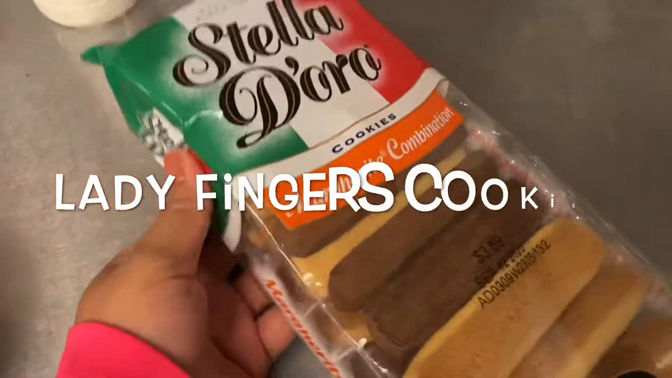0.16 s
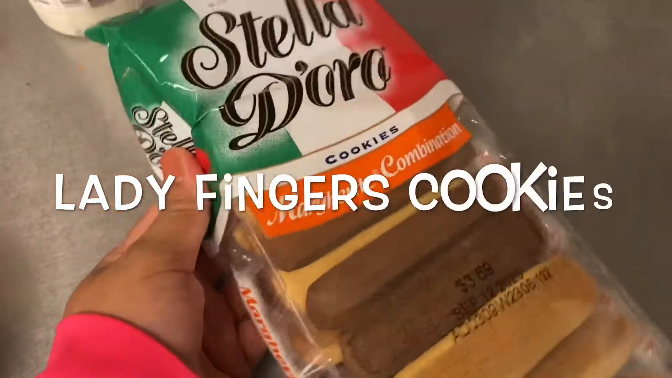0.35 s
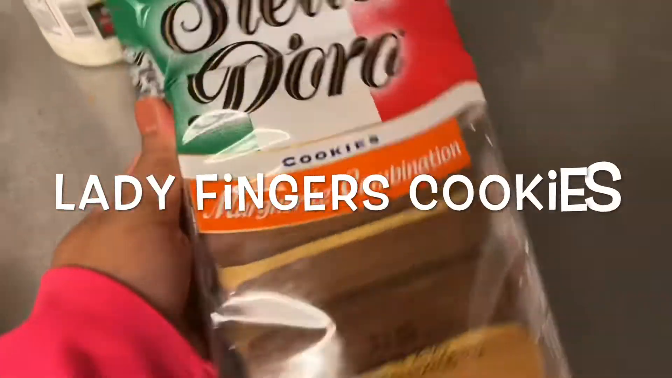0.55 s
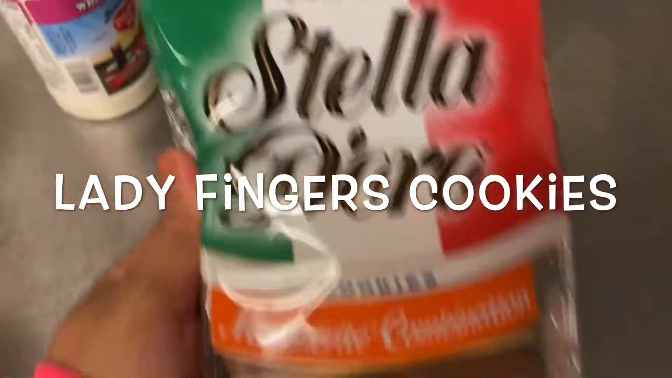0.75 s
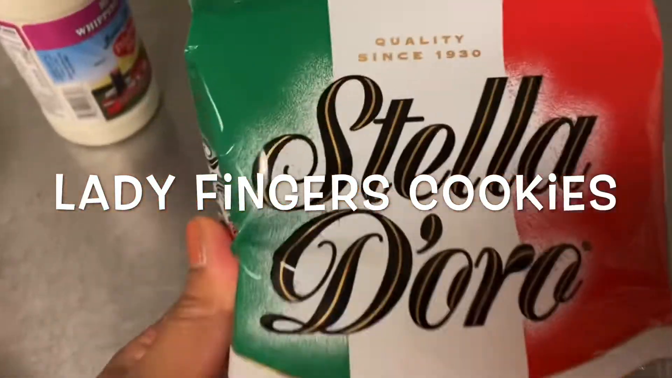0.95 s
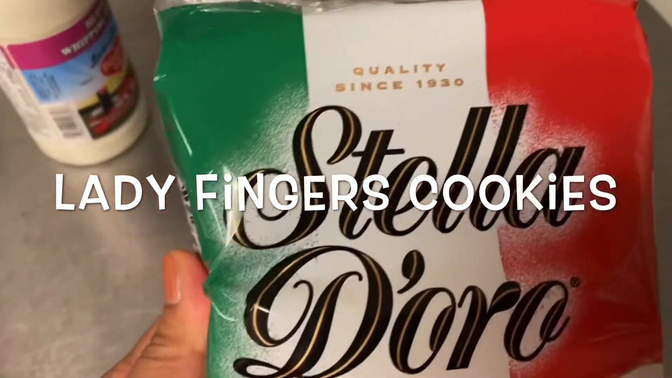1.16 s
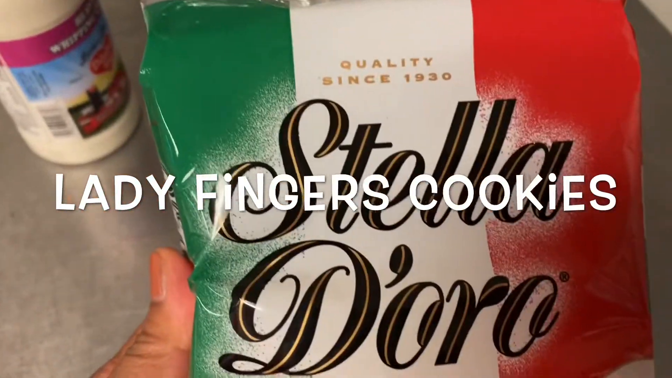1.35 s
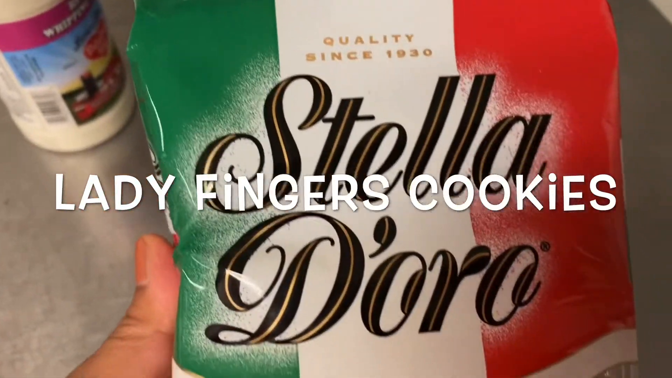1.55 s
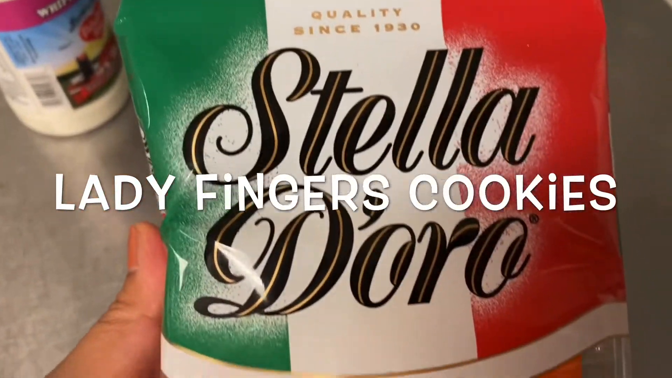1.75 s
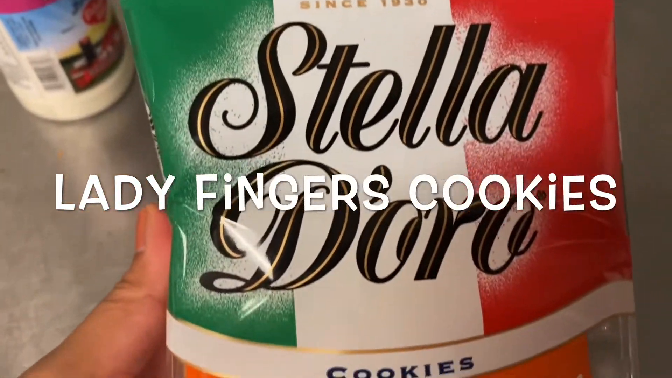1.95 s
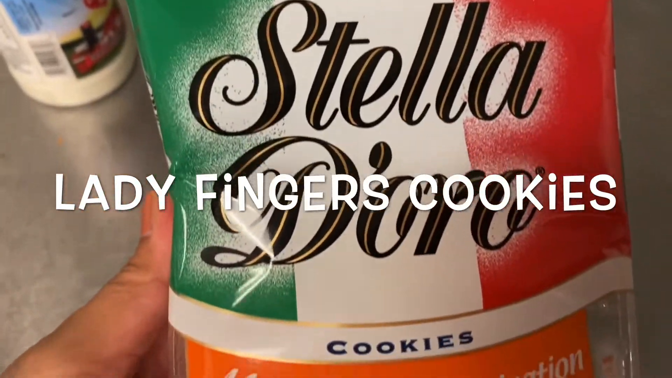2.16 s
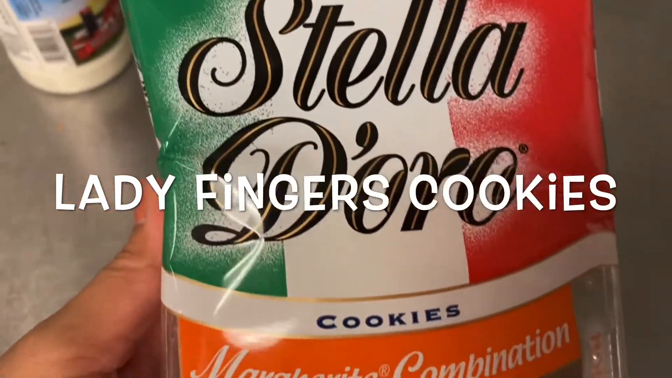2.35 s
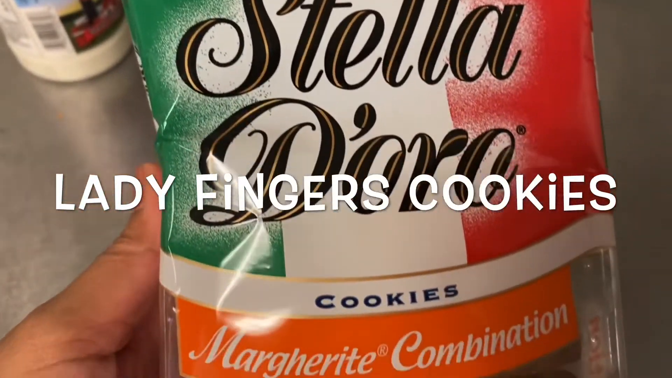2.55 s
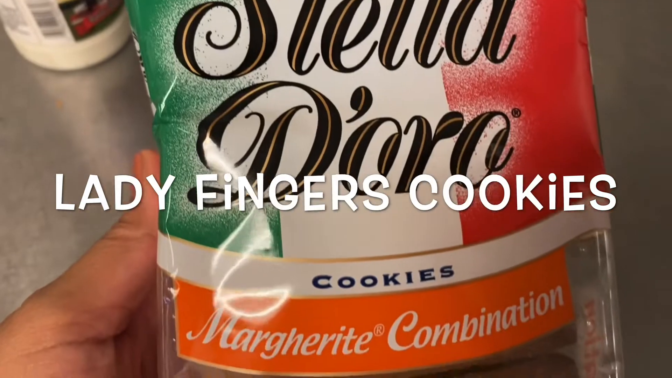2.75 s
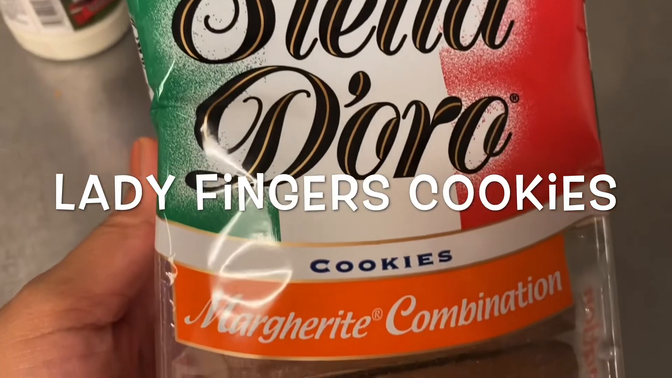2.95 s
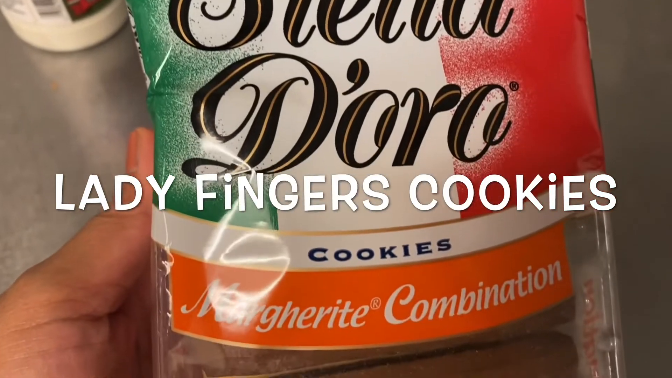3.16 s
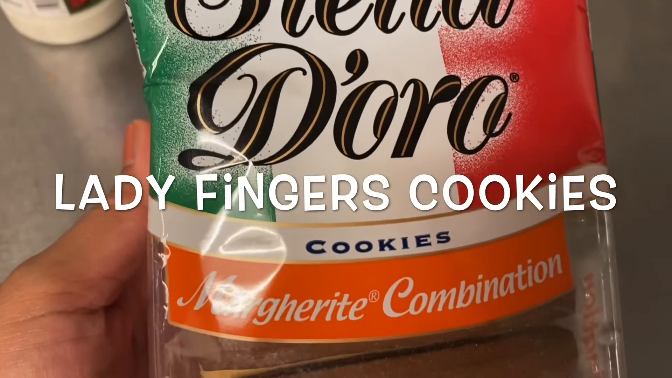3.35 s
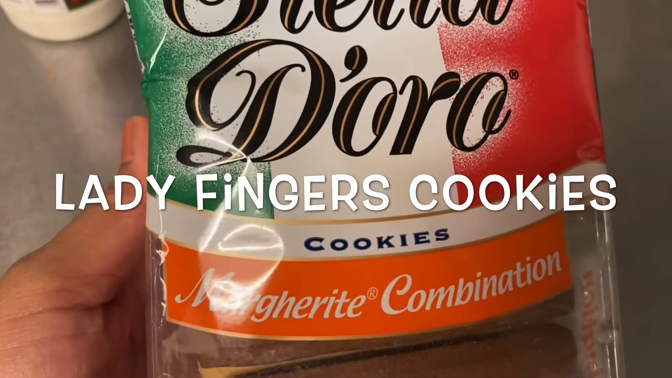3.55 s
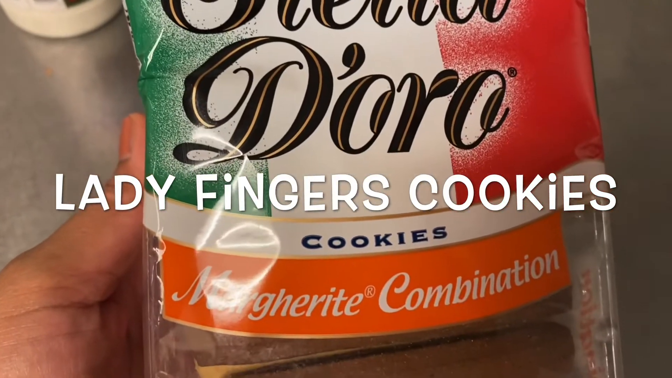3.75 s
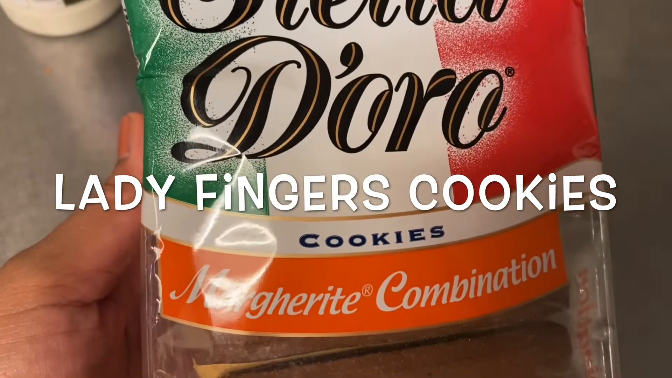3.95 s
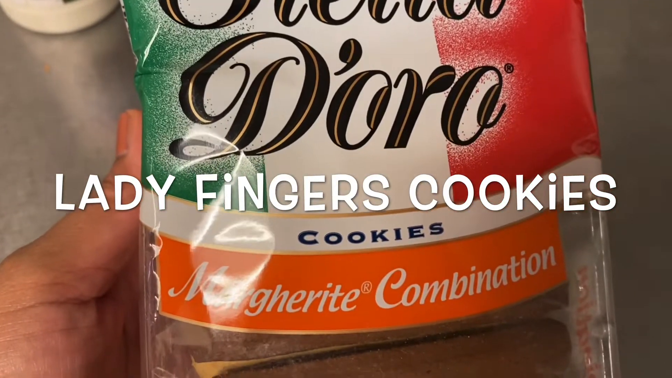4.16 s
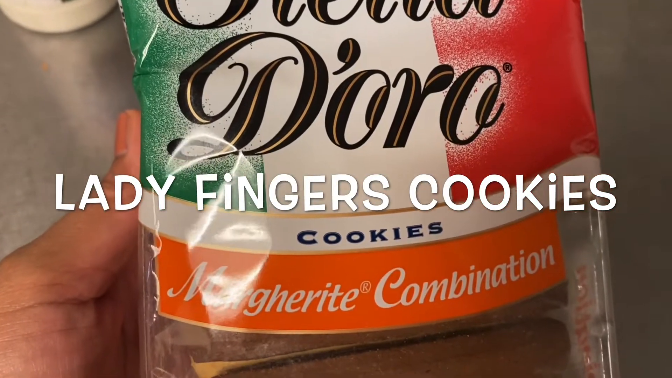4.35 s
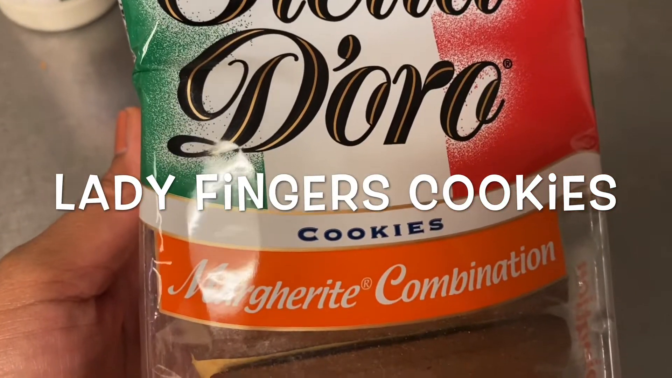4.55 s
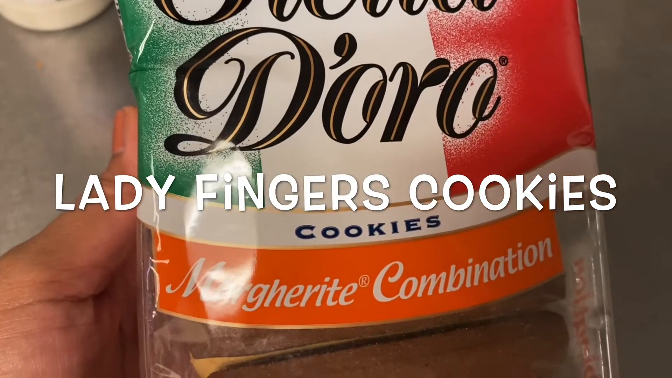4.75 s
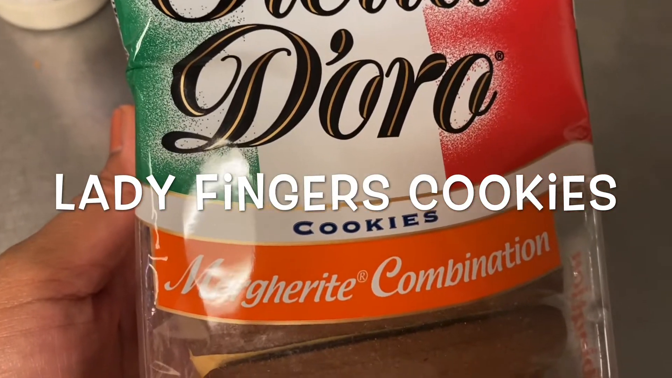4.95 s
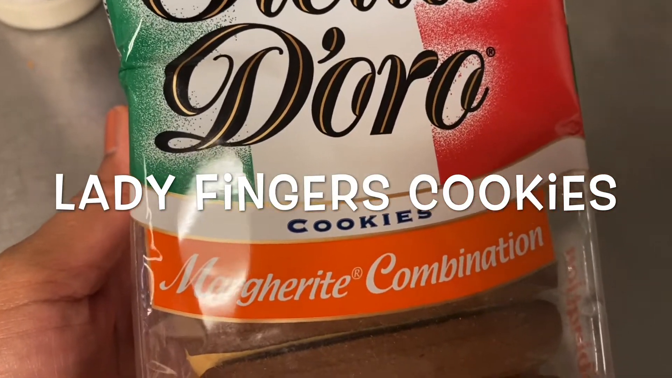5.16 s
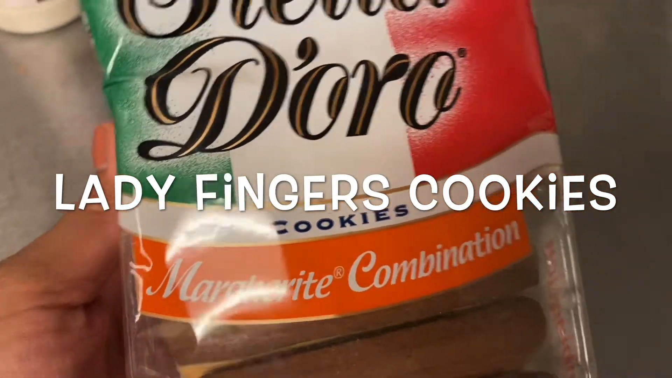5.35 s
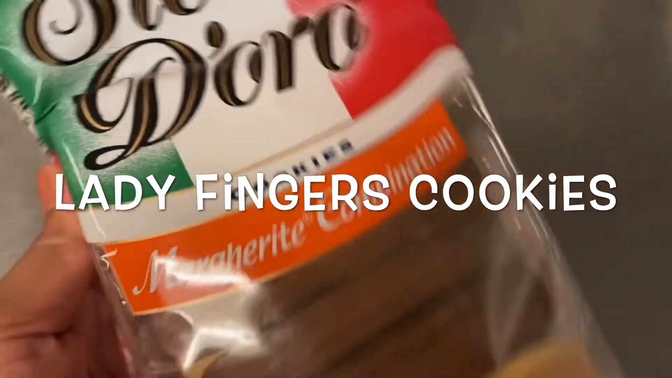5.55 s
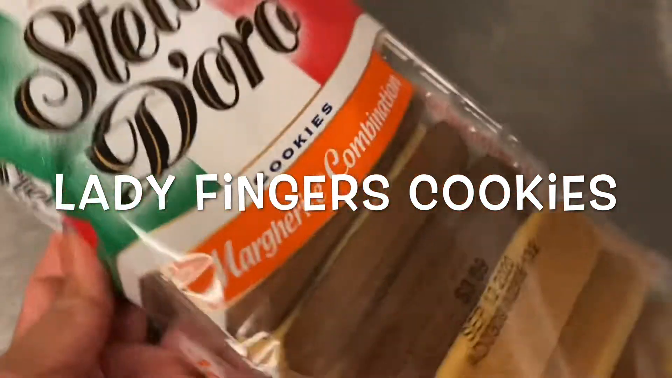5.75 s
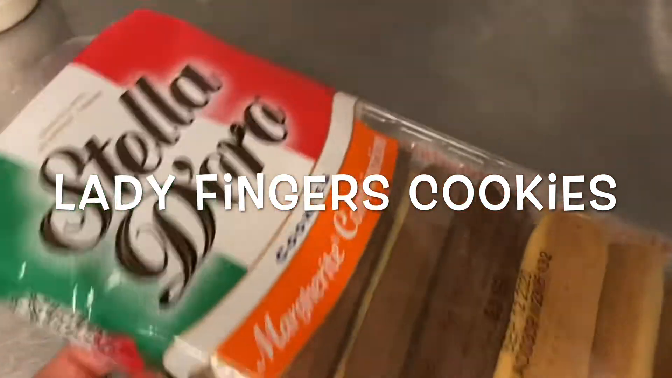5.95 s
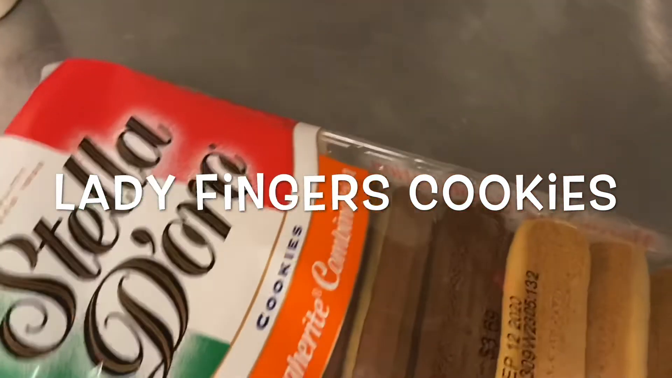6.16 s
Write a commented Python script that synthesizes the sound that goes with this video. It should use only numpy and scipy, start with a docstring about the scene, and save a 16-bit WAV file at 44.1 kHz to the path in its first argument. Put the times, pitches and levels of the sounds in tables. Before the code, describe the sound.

A thin plastic biscuit packet crackles in a lively burst with one loud pop, falls nearly silent, then rustles again over a low refrigerator hum.

```python
"""The film wrapper of a packet of biscuits rustles and its creases snap as bursts of noise and short modes.
The packet is lifted from a kitchen counter, held still and turned away. Its thin plastic tray buckles
once in quick steps with a loud pop, made of damped resonances; fingers scuff the film as plucked tones,
and the hand bumps softly as low swelling tones. Behind them a refrigerator hums in steady tones over a
rush of filtered noise in the small room; two closely spaced microphone ports listen."""
import sys
import numpy as np
from scipy import signal
from scipy.fft import rfft, irfft, next_fast_len
from scipy.io import wavfile
from scipy.ndimage import map_coordinates

SR = 44100
rng = np.random.default_rng(int(sys.argv[2]) if len(sys.argv) > 2 else 0)


def transcribe(signal):
    """Save signal, clipped to [-1, 1], as a 16-bit WAV file at the path in sys.argv[1]."""
    frames = np.atleast_2d(signal).T
    limited = np.clip(frames, -1, 1)
    pcm = np.round(limited * 32767).astype(np.int16)
    wavfile.write(sys.argv[1], SR, pcm)


N = 273861

# Creases whose moments are given one by one, from loud snaps down to faint ticks while the packet is held.
# Each row: start in seconds, level in dB, t60 of the flurry in seconds, hollowness in dB re level,
# sizzle in dB re level, then the facet's four modes in Hz, strongest first.
CREASES = [(0.0615, -35.5, 0.0192, -13, -4, 2750, 4770, 1930, 1370),
           (0.085, -31.5, 0.01312, -2.5, -5.5, 3050, 1440, 2400, 5500),
           (0.1071, -23.5, 0.008, -3, -3, 7320, 2120, 2870, 4700),
           (0.1354, -27, 0.024, -6.5, 0.5, 8110, 5940, 2070, 6600),
           (0.1665, -28, 0.011, -7.5, -8, 5490, 4450, 6420, 7120),
           (0.1771, -27, 0.014, -6.5, 0, 5500, 7490, 4600, 1030),
           (0.1933, -28.5, 0.013, -6, 0.5, 5610, 8120, 2665, 1390),
           (0.2032, -19, 0.021, -9, -5, 2822, 4240, 5010, 5840),
           (0.2076, -19, 0.026, -7.5, -4.5, 2337, 1720, 4070, 4600),
           (0.229, -28, 0.014, -4.5, -6, 5640, 5200, 6180, 3160),
           (0.2377, -20, 0.017, -13, -4.5, 3927, 6600, 2990, 4740),
           (0.2728, -22, 0.012, -7, 1, 4170, 5560, 3090, 8200),
           (0.3024, -27.5, 0.01, 0, -4, 6310, 6940, 3686, 2360),
           (0.3199, -19, 0.01, -8.5, -1.5, 5380, 5990, 3037, 2310),
           (0.3326, -14.5, 0.023, -14.5, -6.5, 2302, 4080, 5740, 3190),
           (0.3524, -27.5, 0.012, -5, -4.5, 1530, 6130, 5610, 6860),
           (0.4221, -29.5, 0.03, -1.5, -11, 1264, 2660, 1785, 5470),
           (0.4387, -30.5, 0.033, -3, -7, 3130, 2580, 1313, 5050),
           (0.4831, -30.5, 0.014, -7, -10.5, 4240, 2990, 2090, 4860),
           (0.495, -29.5, 0.008, -5, -3, 2790, 6350, 4580, 5340),
           (0.4985, -28.5, 0.012, -2, -2.5, 2167, 1360, 6500, 3340),
           (0.5087, -26, 0.028, -4.5, -1.5, 2250, 4840, 3040, 1710),
           (0.5296, -31.5, 0.035, -9.5, 0.5, 6540, 2100, 1658, 3270),
           (0.5417, -30.5, 0.02, -8, 0, 6760, 8270, 3080, 7230),
           (0.6406, -39, 0.04, 3, -5.5, 1310, 3010, 3970, 2160),
           (0.6562, -35.5, 0.022, -1, -6.5, 1171, 2240, 5190, 2910),
           (0.6894, -29, 0.022, -2.5, -2.5, 870, 3270, 5320, 2430),
           (0.6985, -32, 0.011, 2, -6, 5585, 4360, 1850, 6500),
           (0.7441, -26, 0.024, -1.5, -2, 2930, 7300, 5800, 1740),
           (0.7505, -25.5, 0.026, -4.5, -7, 4798, 1550, 3980, 2890),
           (0.767, -32.5, 0.025, -7.5, -5, 1380, 4710, 6020, 2400),
           (0.839, -30.5, 0.009, 3.5, -1, 2930, 4390, 1546, 4960),
           (0.8565, -25, 0.025, -15.5, -6.5, 4920, 6900, 5876, 2740),
           (0.946, -37.5, 0.017, -4, -4.5, 3080, 1160, 1830, 5020),
           (0.9557, -37.5, 0.016, -5.5, -7, 4520, 1680, 3140, 3840),
           (1.291, -42.5, 0.02, -4, -19, 1240, 2970, 3940, 4580),
           (1.4106, -32.5, 0.025, -10, -9, 2540, 3970, 1890, 5800),
           (1.4177, -31.5, 0.02, -4, -4.5, 6350, 7640, 5720, 4550),
           (1.4352, -33.5, 0.008, 1.5, -13, 1440, 2370, 3580, 3080),
           (1.4715, -29, 0.011, -4.5, -2, 6740, 5280, 2600, 910),
           (1.6004, -40, 0.012, 4.5, -21.5, 1120, 2770, 2360, 4150),
           (1.9336, -46, 0.017, 4, -20, 890, 2840, 1440, 2150),
           (2.0331, -38.5, 0.024, -4, -5.5, 970, 2650, 6860, 1670),
           (2.0627, -46.5, 0.026, -2.5, -7.5, 2770, 1390, 5480, 6470),
           (2.543, -39.5, 0.01, -3, -12, 2560, 4300, 3710, 5420),
           (2.6278, -43.5, 0.008, -14, -7.5, 4790, 2260, 5330, 7660),
           (3.0958, -47.5, 0.01, 5.5, -29, 1190, 1910, 3600, 2620),
           (3.1323, -43.5, 0.014, 4, -22.5, 920, 1760, 2760, 3270),
           (3.482, -31.5, 0.022, -2.5, -13.5, 1080, 2290, 3130, 8050),
           (4.3035, -48, 0.0135, 7.5, -29, 1390, 2790, 2300, 3940),
           (4.956, -25.5, 0.018, -4, -12, 1490, 6310, 4870, 3220),
           (5.1575, -29, 0.047, -6.5, -10.5, 1480, 880, 2640, 1950),
           (5.1827, -33, 0.039, -2.5, -9, 1970, 3280, 1190, 6600),
           (5.2139, -30.5, 0.021, -4, -11.5, 5200, 6840, 1570, 2520),
           (5.2279, -30.5, 0.012, -4.5, -5.5, 6630, 4000, 2123, 1360),
           (5.3023, -33.5, 0.011, -9.5, -0.5, 1350, 5110, 6114, 7300),
           (5.3095, -33.5, 0.025, -4, -4, 1013, 2580, 7020, 6560),
           (5.3209, -35, 0.012, 1.5, -11, 875, 1570, 2180, 2820),
           (5.3445, -34, 0.014, -7, -7.5, 4470, 1500, 891, 2390),
           (5.3525, -34.5, 0.012, -5.5, -3.5, 1490, 980, 7210, 2800),
           (5.4058, -24, 0.012, -6, -12.5, 5030, 6000, 2240, 3000),
           (5.4176, -31, 0.009, 3, -18, 2330, 3660, 3180, 1630),
           (5.4388, -26.5, 0.014, -4.5, -7, 1083, 6260, 2570, 4260),
           (5.4561, -23, 0.013, -4, -9, 2570, 1460, 2110, 4330),
           (5.4915, -17, 0.009, -7.5, -8.5, 1025, 1890, 3196, 6150),
           (5.4985, -23, 0.014, -6, -8.5, 890, 2660, 2130, 3960),
           (5.5295, -25.5, 0.034, -1.5, -4, 877, 2220, 3980, 1370),
           (5.5779, -25.5, 0.014, -9.5, -10, 2150, 2930, 990, 6750),
           (5.5896, -22.5, 0.034, -6, -4.5, 5610, 1510, 2660, 3570),
           (5.6219, -25, 0.018, -5.5, -1.5, 1014, 3200, 1490, 6970),
           (5.628, -26.5, 0.024, -3, -6, 2110, 3910, 5800, 3030),
           (5.7085, -31.5, 0.026, -4.5, -6.5, 6040, 3050, 7600, 870),
           (5.7366, -19.5, 0.036, -4.5, -3.5, 1523, 2780, 5250, 3270),
           (5.7485, -21.5, 0.023, -5, -5, 1402, 2550, 3545, 4070),
           (5.7792, -27, 0.01, -16.5, 2.5, 6400, 6900, 3020, 3530),
           (5.7921, -31.5, 0.038, -6.5, -2, 5420, 3050, 900, 6630),
           (5.8355, -36, 0.015, -2.5, 4.5, 8160, 1400, 2560, 6500),
           (5.8809, -23, 0.07, -7, -8, 950, 1970, 2560, 5330),
           (5.9035, -30, 0.013, -4, -1, 5150, 2530, 5700, 7760),
           (5.9279, -24.5, 0.012, -10, -3.5, 6930, 6200, 2830, 3960),
           (5.933, -24, 0.012, -13, -2.5, 6690, 4730, 5880, 2450),
           (5.9742, -26, 0.015, -4, -10, 1024, 4930, 4280, 8160),
           (6.0661, -30, 0.043, -13, -3.5, 6620, 2270, 8160, 3690),
           (6.0857, -21.5, 0.093, -9.5, -4.5, 2821, 3690, 2127, 4630),
           (6.0952, -17, 0.017, -10, -6.5, 6500, 1560, 2394, 1110),
           (6.144, -30, 0.042, -7.5, -11, 2990, 2400, 1914, 1470)]
# Levels of a facet's four modes, strongest first, in dB.
FACET_LEVELS = [-6.5, -8, -9.5, -10.5]
# Spectrum of the film. Each row: frequency in Hz, relative density in dB per Hz.
FILM_SPECTRUM = [(500, -19.5), (900, -14), (1450, -5), (1850, -3.5), (2400, 5.5), (4000, 6), (6700, 1.5),
                 (8000, -9), (10500, -26)]
# Spectrum of the smallest creases. Each row: frequency in Hz, relative density in dB per Hz.
SIZZLE_SPECTRUM = [(5500, -6.5), (8200, 2), (11000, -1), (15500, -2.5), (16400, -26)]
# Spectrum of the air-filled packet. Each row: frequency in Hz, relative density in dB per Hz.
HOLLOW_SPECTRUM = [(30, -56.5), (130, -12.5), (300, 3.5), (730, -3), (1050, 1), (1500, -2.5), (2400, -23.5),
                   (8000, -54.5)]
PACKET_HZ = 728  # the hollow note of the packet
# Random small creases while the hand moves: rate, level re effort, spread of level.
SMALL_PER_S, SMALL_DB, SMALL_SPREAD_DB = 30, 5, 0.5

# How hard the hand works the film: one list each for lifting it, easing the grip and turning it away.
# Each row: time in seconds, effort in dB.
HAND_EFFORT = [
    [(0, -44), (.07, -48), (.13, -42.5), (.27, -37.5), (.38, -41.5), (.44, -43.5), (.465, -48),
     (.51, -38.5), (.58, -57), (.68, -47), (.78, -43), (.88, -56), (1.09, -66.5)],
    [(1.91, -64.5), (2.01, -66), (2.1, -72)],
    [(5.07, -65), (5.15, -61.5), (5.27, -52.5), (5.32, -44.5), (5.4, -41.5), (5.47, -49.5), (5.6, -37),
     (5.68, -50), (5.88, -39.5), (5.99, -51.5), (6.09, -44.5), (6.21, -53)],
]
EASE_S = 0.038  # the hand starts and stops this quickly
# Spectrum of crackling film. Each row: frequency in Hz, relative density in dB per Hz.
CRACKLE_SPECTRUM = [(200, -44.5), (600, -20), (1400, 1), (1850, -0.5), (2400, 2.5), (4500, 0), (7000, -1),
                    (10000, -5), (15500, -10), (16400, -27)]
# Spectrum of fingers rubbing the film. Each row: frequency in Hz, relative density in dB per Hz.
RUB_SPECTRUM = [(30, -45), (120, -5), (280, 1), (450, -3), (750, -6), (1300, -9), (2500, -16.5),
                (9000, -50)]
# Fingers sliding a short way. Each row: start in seconds, length in seconds, level in dB, panel pitch in Hz.
FINGER_STROKES = [(0.0, 0.025, -33.5, 805), (0.01, 0.06, -39, 329), (0.199, 0.048, -29.5, 760),
                  (0.282, 0.037, -30.5, 768.6), (0.371, 0.051, -29, 750), (0.399, 0.046, -34, 480),
                  (0.493, 0.034, -37, 520), (0.549, 0.031, -42, 750), (5.181, 0.051, -42.5, 890),
                  (5.208, 0.1, -43, 1380), (5.301, 0.043, -36, 921), (5.56, 0.13, -41, 800),
                  (5.85, 0.09, -37, 738), (6.088, 0.044, -35, 910)]
# Spectrum of the sliding fingers. Each row: frequency in Hz, relative density in dB per Hz.
SCUFF_SPECTRUM = [(30, -51.5), (200, -11), (400, 5.5), (800, -1.5), (1100, -5), (1500, -5.5), (2100, -10.5),
                  (4000, -18.5)]

# The tray giving way in steps. Each row: start in seconds, level in dB before the offsets of ring,
# crack and thud, brightness in Hz, t60 in seconds (halved for the ring).
BUCKLES = [(0.782, -7.5, 900, 0.04), (0.7905, 2, 9960, 0.018), (0.7921, -5.5, 7000, 0.021),
           (0.7943, -0.5, 6000, 0.014)]
# Modes of the tray's walls. Each row: frequency in Hz, width in Hz before the added damping, level in dB.
WALL_MODES = [(1324, 98, 5), (1480, 74, 3), (2070, 60, -2), (2540, 45, -3.5), (2960, 45, -0.5),
              (4000, 70, 1.5), (5130, 110, 2.5), (5650, 90, -5.5), (6724, 110, -5.5)]
# Shifts of the grip. Each row: start in seconds, length in seconds, peak of the tone in dB, pitch in Hz.
GRIP_SHIFTS = [(0.005, .14, -33, 58.5), (0.133, .16, -35.5, 62), (0.544, .045, -33.5, 90),
               (5.216, .05, -35, 90), (5.354, .05, -34.5, 95), (5.572, .11, -34, 70),
               (5.869, .19, -31.5, 56)]

# Decay of the room. Each row: frequency in Hz, t60 in seconds.
ROOM_DECAY = [(200, 0.72), (2000, 0.57), (6000, 0.39), (14000, 0.13)]
# Likeness of the ports for near sounds. Each row: frequency in Hz, left-right likeness.
NEAR_LIKENESS = [(300, 0.94), (900, 0.51), (1700, 0.45), (3500, 0.74), (5600, 0.2547), (7500, 1),
                 (15000, 0.75)]
# Likeness of the ports for the air and the room. Each row: frequency in Hz, left-right likeness.
AIR_LIKENESS = [(60, 1), (290, 0.39), (900, 0), (3100, 0.34), (7000, 0.89)]
# Place of the packet. Each row: frequency in Hz, dB up on the left and down on the right.
LEFT_TILT = [(200, 1), (600, 1.77), (2500, 0.7), (5000, 1.27), (9000, 0)]

# Compressor and fan tones. Each row: frequency in Hz, rms level in dB about which the tone wavers.
HUM_TONES = [(58.6, -51.5), (79.3, -49.5), (128.9, -57.5), (144.8, -56.5), (174.2, -61.5), (240.8, -53),
             (258.1, -50), (317, -63), (405.5, -55), (409.1, -63), (700, -65)]
# Thin electrical whine. Each row: time in seconds, rms level in dB about which it wavers.
WHINE_LEVEL = [(1.2, -85.5), (1.9, -80), (4.5, -74.5)]
# Spectrum of the rush of air. Each row: frequency in Hz, relative density in dB per Hz.
AIR_SPECTRUM = [(18, -34.5), (30, -20), (42, -12.5), (56, -10.5), (90, -3.5), (130, -4.5), (175, -4.5),
                (205, -13), (290, -7.5), (450, -15.5), (750, -18.5), (1400, -28.5), (2350, -34),
                (2700, -33.5), (3200, -40), (5800, -46.5), (6800, -47.5), (10000, -57), (16000, -75)]
# Phase between the ports. Each row: frequency in Hz, lead of the left in radians.
PORT_LEAD = [(0, 0), (1400, .5), (2400, 0), (7000, 0), (9000, -3.14), (13200, -9.4), (16000, -13)]
TOP_HZ = 16300  # band limit


def snap(db, t60, hollow_db, fine_db, *modes_hz, tip_db=-3.5, film_db=-5.5, sizzle_db=1,
         puff_db=-2, body_db=-5.0, body_t60=0.021, sizzle_life=0.83):
    """Snap-through: a crease flips with a tick, a facet rings, wrinkles sizzle and the packet answers hollowly."""
    rise = .035 * t60
    tick = amp(tip_db) * burst(.004, rise=.0002)
    flurry = sized(coloured(tick + burst(t60, rise), FILM_SPECTRUM), film_db)
    facet_t60 = np.sqrt(.012 * t60)  # lies between 12 ms and the flurry's t60
    facet = sum(sized(ring(hz, facet_t60, rise), mode_db) for hz, mode_db in zip(modes_hz, FACET_LEVELS))
    sizzle = sized(coloured(burst(t60 * sizzle_life, rise), SIZZLE_SPECTRUM), sizzle_db)
    puff = sized(coloured(burst(body_t60, 2 * rise), HOLLOW_SPECTRUM), puff_db)
    note = sized(ring(PACKET_HZ, body_t60, 2 * rise), body_db)
    return amp(db) * (flurry + facet + amp(fine_db) * sizzle + amp(hollow_db) * (puff + note))


def snaps(snap_db=0):
    """Impulsive release of strain: creases give way one by one at given moments, some loudly, some faintly."""
    out = np.zeros((2, N))
    for s, *crease in CREASES:
        add(out, s, amp(snap_db) * snap(*crease))
    return stereo(out, NEAR_LIKENESS)


def small_snaps(t60=0.014, lowest_hz=900, highest_hz=7500, hollow_db=-4, fine_db=-6):
    """Random release of strain: small creases flip as strongly as the hand works, each with its own facet."""
    gain, out = effort(), np.zeros((2, N))
    slots = int(SMALL_PER_S * N / SR)
    # one random moment in each equal slot of time
    at = ((np.arange(slots) + rng.random(slots)) * (N - 1) / slots).astype(int)
    for i in at[gain[at] > 0]:
        modes_hz = lowest_hz + (highest_hz - lowest_hz) * rng.random(4)
        db = SMALL_DB + SMALL_SPREAD_DB * rng.standard_normal()
        add(out, i / SR, gain[i] * snap(db, t60, hollow_db, fine_db, *modes_hz))
    return stereo(out, NEAR_LIKENESS)


def effort():
    """Slow amplitude modulation: the hand's effort as a gain, zero while the packet is held still."""
    t = np.arange(N) / SR
    gain = np.zeros(N)
    for rows in HAND_EFFORT:
        s, db = np.transpose(rows)
        ease = np.clip(1 + np.minimum(t - s[0], s[-1] - t) / EASE_S, 0, 1)
        gain += ease * amp(np.interp(t, s, db))
    return gain


def grains(rate, spread_db, t60):
    """Shot noise: many small slips at random moments, a few much larger, swell a noise pair of rms 1."""
    sizes = amp(spread_db * np.minimum(rng.standard_exponential(N), 4))
    slips = (rng.random(N) < rate / SR) * sizes * rng.standard_normal(N)
    decay = fade(np.arange(SR // 20) / SR, t60)
    power = signal.fftconvolve(slips ** 2, decay ** 2)[:N]
    return unit(np.sqrt(np.abs(power)) * rng.standard_normal((2, N)))


def handling(crackle_db=0, rub_db=3):
    """Granular friction noise: while the hand moves, the film crackles and fingers rub over it."""
    crackle = unit(coloured(grains(rate=600, spread_db=2.5, t60=.009), CRACKLE_SPECTRUM))
    rub = unit(coloured(grains(rate=1500, spread_db=1, t60=.025), RUB_SPECTRUM))
    return stereo(effort() * (amp(crackle_db) * crackle + amp(rub_db) * rub), NEAR_LIKENESS)


def plucks(rate, t60, top_hz=4000):
    """Free vibration: every slip plucks a patch of film with its own pitch; a pair of rms 1."""
    t = np.arange(SR // 150) / SR
    start, pitch, size = rng.random((int(rate * N / SR), 3)).T[:, :, None]
    rings = (1 + size) * np.sin(2 * np.pi * top_hz * pitch * t) * fade(t, t60)
    at = (start * N).astype(int) + np.arange(len(t))
    track = np.bincount(at.ravel(), rings.ravel(), N)[:N]
    return unit(np.array([track, np.roll(track, SR)]))  # a shift of 1 s makes the sides unrelated


def scuffs(scuff_db=0, panel_db=3, panel_width_hz=220):
    """Stick-slip: skin slips on the film; each stroke swells, dies and rings the panel that it crosses."""
    slips = coloured(plucks(rate=1600, t60=.016), SCUFF_SPECTRUM)
    out = np.zeros((2, N))
    for s, length, db, hz in FINGER_STROKES:
        stroke = slips[:, max(round(s * SR), 0):][:, :round(length * SR)]
        stroke = unit(filtered(stroke, lambda f: 1 + amp(panel_db) * resonance(f, hz, panel_width_hz)))
        swell = np.sin(np.linspace(0, np.pi, stroke.shape[1]))
        add(out, s, amp(db + scuff_db) * stroke * swell)
    return stereo(out, NEAR_LIKENESS)


def mirrored(x):
    """Comb filtering: the counter mirrors the rustle; the delay wanders, and with it the colour."""
    late = np.arange(N) - .0014 * SR * amp(2.5 * wobble(8))  # about 1.4 ms
    copy = x[:, np.clip(np.round(late), 0, N - 1).astype(int)]
    return .82 * x + .55 * copy


def tray(ring_db=-14, crack_db=-15, thud_db=-26):
    """Buckling: the tray flexes dully, then gives way in quick steps that ring walls damped by the biscuits."""
    def walls(f):
        # neighbouring modes have opposite sign; the biscuits add 130 Hz of width
        return sum((-1) ** k * amp(db) * resonance(f, hz, width + 130)
                   for k, (hz, width, db) in enumerate(WALL_MODES))
    out = np.zeros((2, N))
    for s, db, bright_hz, t60 in BUCKLES:
        soft = lambda f: 1 / (1 + 1j * f / bright_hz) ** 2  # lower brightness, duller step
        ringing = filtered(burst(t60 / 2, rise=.0001), lambda f: walls(f) * soft(f))
        crack = filtered(coloured(burst(t60, rise=0.00015), CRACKLE_SPECTRUM), soft)
        thud = filtered(coloured(burst(t60, rise=0.00087), HOLLOW_SPECTRUM), soft)
        add(out, s, sized(ringing, db + ring_db) + sized(crack, db + crack_db) + sized(thud, db + thud_db))
    return stereo(out, NEAR_LIKENESS)


def jolts(shudder_rad=.5, rumble_db=-11):
    """Low-frequency oscillation: each shift of the grip gives a brief, uneven thump with a little rumble."""
    t = np.arange(N) / SR
    noise = rng.standard_normal((2, N))
    rumble = amp(rumble_db) * unit(filtered(noise, lambda f: resonance(f, 115, 90.6) ** 2))[0]
    unsteady = shudder_rad * wobble(25)
    out = np.zeros(N)
    for s, length, db, hz in GRIP_SHIFTS:
        swell = np.sin(np.pi * np.clip((t - s) / length, 0, 1))
        out += amp(db) * swell * (np.sin(2 * np.pi * hz * (t - s) + unsteady) + rumble)
    return out


def kitchen(x, early_db=-22, tail_db=-18, early_t60=.05):
    """Reverberation: near surfaces answer at once; walls gather sound from all sides into a faint, even tail."""
    hz, t, z = signal.stft(rng.standard_normal((2, SR // 2)), SR, nperseg=256)
    tail = signal.istft(z * fade(t, along(ROOM_DECAY, hz)[:, None]), SR, nperseg=256)[1]
    tail = amp(tail_db) * tail / np.linalg.norm(tail[0])
    early = np.zeros_like(tail)
    add(early, .003, amp(early_db) * burst(early_t60, rise=0.0017))
    # random signs and sizes erase the packet's own colour before the tail
    scattered = np.std(x[0]) * unit(coloured(x[:1] * rng.standard_normal(N), CRACKLE_SPECTRUM))

    def answer(source, echo):
        return signal.oaconvolve(source, stereo(echo, AIR_LIKENESS), axes=1)[:, :N]
    return x + answer(x[:1], early) + answer(scattered, tail)


def refrigerator(air_db=-46.0, hum_db=0, whine_hz=4473, drift_rad=0.097, waver_db=1.2):
    """Periodic and turbulent sources: unsteady compressor and fan tones and a thin whine over a rush of air."""
    t = np.arange(N) / SR

    def tone(hz, db):
        level = np.sqrt(2) * amp(db + waver_db * wobble(1.3))
        return level * np.sin(2 * np.pi * (hz * t + rng.random()) + drift_rad * wobble(4.3))
    hum = sum(tone(hz, db + hum_db) for hz, db in HUM_TONES)
    whine = tone(whine_hz, np.interp(t, *np.transpose(WHINE_LEVEL)))
    air = unit(coloured(rng.standard_normal((2, N)), AIR_SPECTRUM))
    return hum + whine + stereo(amp(air_db) * air, AIR_LIKENESS)


def burst(t60, rise, uneven_db=4):
    """Decaying noise: a pair of flurries of energy 1 whose strength jumps about every millisecond."""
    t = np.arange(SR // 12) / SR
    jumps = np.clip(rng.standard_normal(len(t) // 40 + 1), -1.5, 1.5)
    steps = np.repeat(jumps, 40)[:len(t)]
    envelope = amp(uneven_db * steps) * fade(t, t60) * (1 - np.exp(-t / rise))
    x = rng.standard_normal((2, len(t))) * envelope
    return x / np.linalg.norm(x, axis=1, keepdims=True)


def ring(hz, t60, rise):
    """Damped free vibration: a pair of tones of one pitch; low bending waves take longer to build up."""
    t = np.arange(SR // 12) / SR
    envelope = fade(t, t60) * (1 - np.exp(-t / (rise + 1 / hz)))
    return np.sin(2 * np.pi * (hz * t + rng.random((2, 1)))) * envelope


def resonance(f, hz, width):
    """Forced resonance: complex response of one mode, gain 1 at its centre."""
    return 1j * f * width / (hz * hz - f * f + 1j * f * width)


def amp(db):
    """Logarithmic level: decibels to gain."""
    return np.exp(np.asarray(db) * np.log(10) / 20)


def unit(x):
    """Normalisation of power: scale to rms 1."""
    return x / np.sqrt(np.mean(x ** 2) + 1e-20)


def sized(x, db):
    """Normalisation of energy: scale a short pair to the energy of 3 ms at this rms level."""
    return amp(db) * x / np.sqrt(np.sum(x ** 2, axis=1, keepdims=True) / (.003 * SR))


def along(points, hz):
    """Logarithmic frequency scale: (Hz, value) points read between on a log axis."""
    f, v = np.transpose(points)
    return np.interp(np.log(hz + 1), np.log(f + 1), v)


def wobble(rate):
    """Slow random modulation: a smooth curve with rate knots a second."""
    coarse = np.arange(0, N + 256, 256)
    knots = rng.standard_normal(int(N * rate / SR) + 4)
    curve = map_coordinates(knots, [coarse * rate / SR])
    return np.interp(np.arange(N), coarse, curve)


def fade(t, t60):
    """Exponential decay: 60 dB down after t60."""
    return np.exp(-np.log(1000) * t / np.maximum(t60, 1e-3))


def filtered(x, response):
    """Linear filtering: x times a complex response of frequency."""
    n = x.shape[-1]
    m = 2 * next_fast_len(n // 2 + 2048)
    return irfft(rfft(x, m) * response(np.fft.rfftfreq(m, 1 / SR)), m)[..., :n]


def coloured(x, spectrum):
    """Minimum phase: a causal filter with the given (Hz, dB) shape, so attacks stay sharp."""
    def response(hz):
        cepstrum = irfft(np.log(amp(along(spectrum, hz))))
        half = len(cepstrum) // 2
        return np.exp(rfft(np.r_[cepstrum[0], 2 * cepstrum[1:half], np.zeros(half)]))
    return filtered(x, response)


def stereo(pair, alike):
    """Coherence: two unrelated signals become left and right with the given likeness."""
    def weights(hz):
        turn = np.arccos(np.clip(along(alike, hz), -1, 1)) / 2
        return np.array([np.cos(turn), np.sin(turn)])
    mid, side = filtered(pair, weights)
    return np.array([mid + side, mid - side])


def add(track, s, sound):
    """Superposition: mix a short sound in at time s."""
    part = track[:, max(round(s * SR), 0):][:, :sound.shape[1]]
    part += sound[:, :part.shape[1]]


def scene():
    """Superposition with a level difference: the packet is close and a little to the left."""
    steady = refrigerator() + jolts()
    packet = kitchen(tray() + mirrored(handling() + scuffs()) + snaps() + small_snaps())
    return steady + filtered(packet, lambda hz: amp(along(LEFT_TILT, hz) * np.array([[1], [-1]])))


def record(dry):
    """Phase difference, saturation and band limit: the ports differ in the treble and loud peaks are rounded."""
    phase = lambda hz: np.interp(hz, *np.transpose(PORT_LEAD))
    ports = filtered(dry, lambda hz: np.exp(.5j * phase(hz) * np.array([[1], [-1]])))
    rounded = ports / (1 + (ports / .85) ** 4) ** .25
    return filtered(rounded, lambda hz: hz < TOP_HZ)


dry = scene()
out = record(dry)
transcribe(out)
```